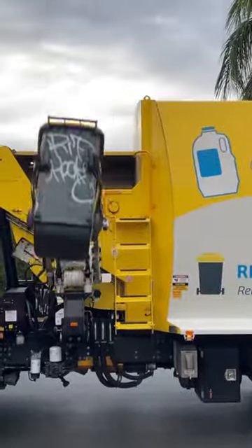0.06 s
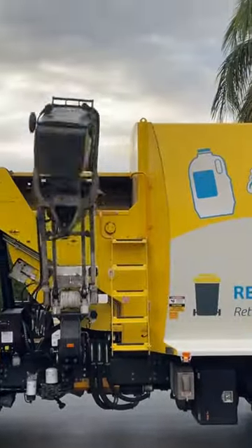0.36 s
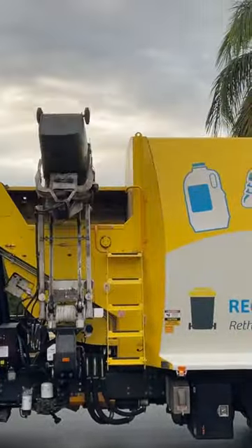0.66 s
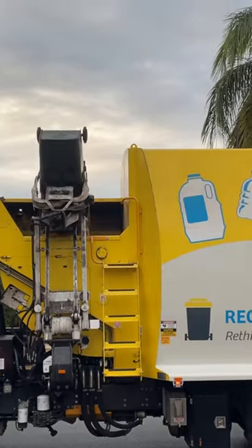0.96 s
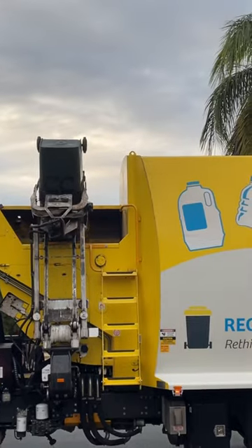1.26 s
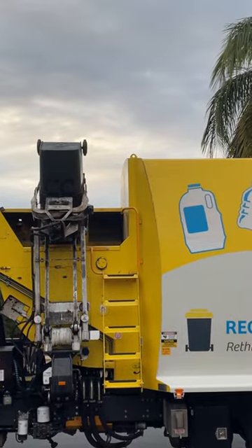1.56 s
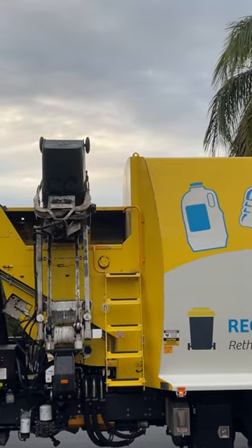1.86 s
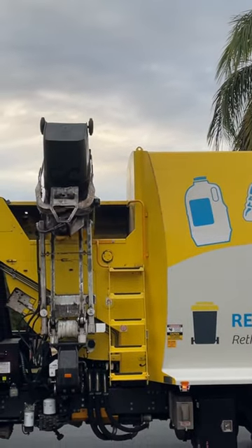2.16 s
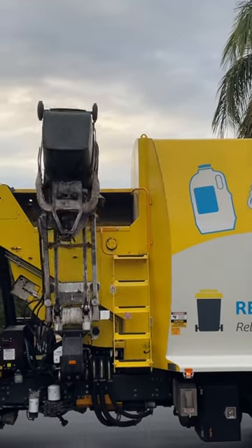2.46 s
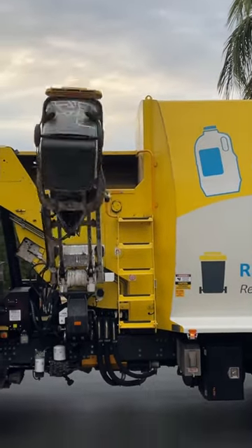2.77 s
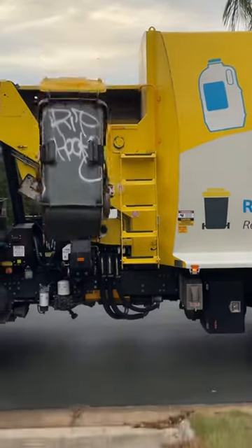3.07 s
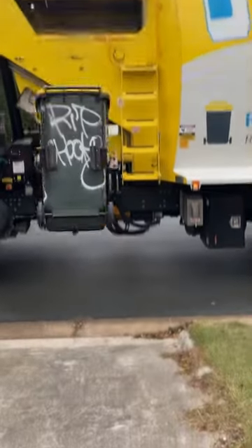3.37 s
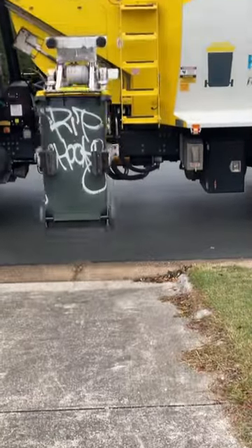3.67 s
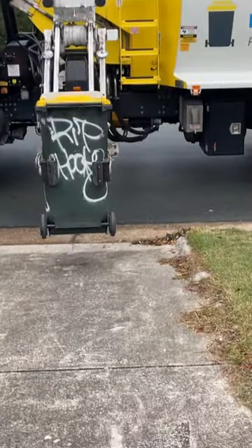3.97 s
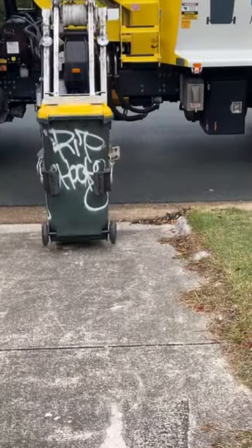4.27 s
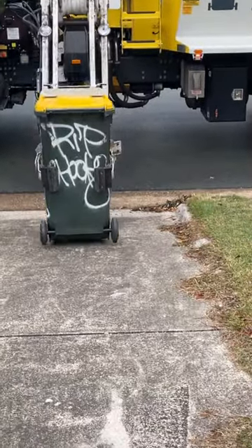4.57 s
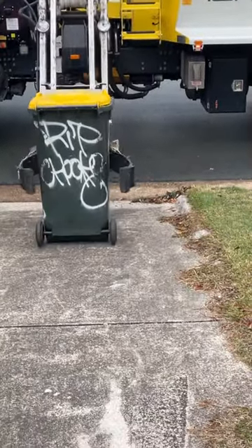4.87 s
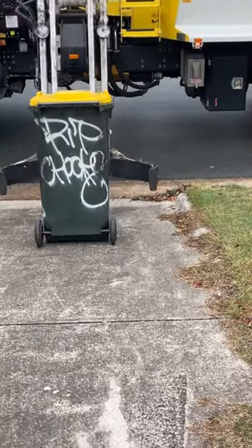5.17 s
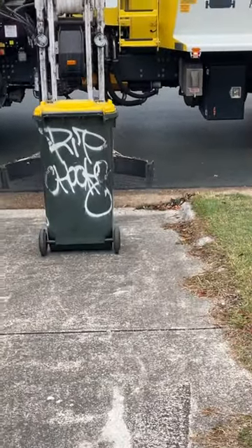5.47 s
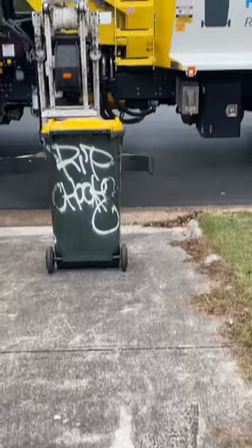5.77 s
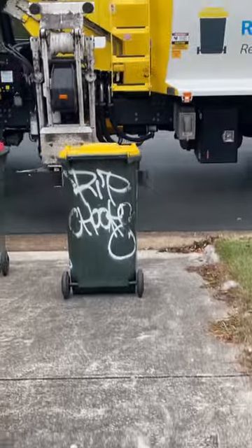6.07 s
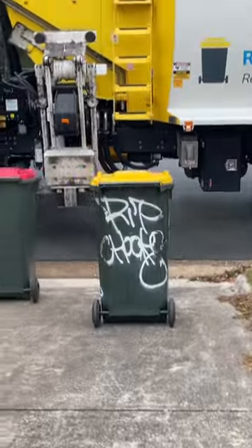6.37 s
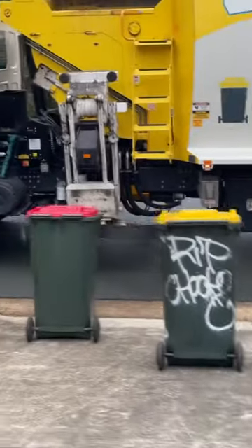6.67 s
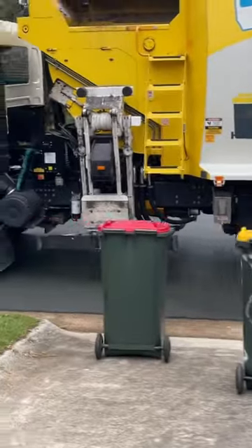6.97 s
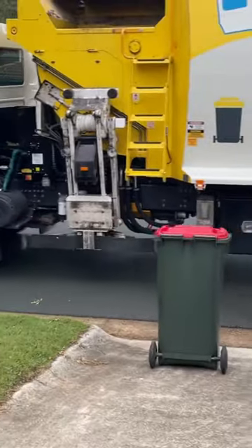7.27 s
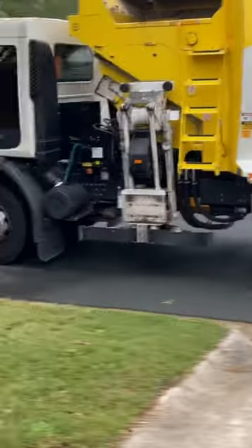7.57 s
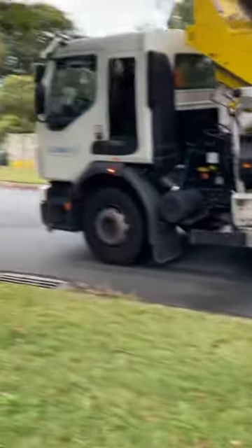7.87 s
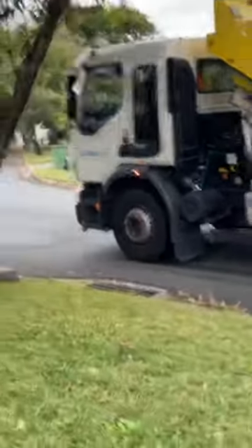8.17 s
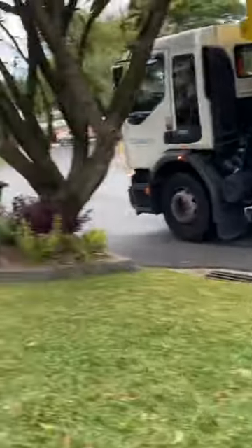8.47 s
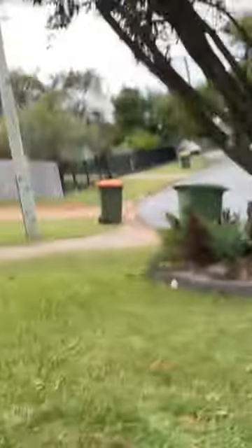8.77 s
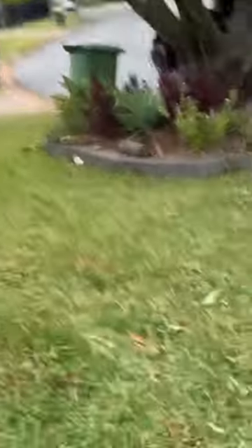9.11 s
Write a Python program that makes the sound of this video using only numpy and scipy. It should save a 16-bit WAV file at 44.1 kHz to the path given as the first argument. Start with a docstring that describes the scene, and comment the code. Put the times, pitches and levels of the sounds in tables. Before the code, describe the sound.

A recycling truck's diesel engine labours at the kerb, heard from the footpath, while hydraulic valves whistle and a steel arm clanks. From about 0.8 to 1.4 seconds bottles and cans crash into the hopper in two loud surges, with heavy thuds, metal bangs and short squeals; the last pieces trickle out until about 2 seconds. The engine dips briefly, then idles as the arm lowers with a hum, a faint whistle and clanks near 2.8 and 3.3 seconds. At about 4.8 seconds the empty plastic bin scuffs and lands on concrete with a hollow boom. Lighter knocks follow, and the gripper creaks briefly near 5.8 seconds. The engine then revs steadily higher, with a sharp clank at 7.2 seconds, thin whines and ringing body panels as the truck pulls away. The revs peak around 8.5 seconds and ease off by 9.3.

```python
"""A side-loading recycling truck stands at the kerb, its diesel and hydraulic pump labouring to lift a bin.
Valves whistle, the steel arm clanks and squeals by stick-slip friction, and after about a second
bottles and cans crash into the resonant hopper. The engine idles as the arm lowers, and near five
seconds the hollow bin booms down on concrete. The gripper creaks open; last, the engine revs,
driving the body panels into resonance, and the truck pulls away."""
import sys
import numpy as np
from scipy import signal
from scipy.fft import rfft, irfft, next_fast_len
from scipy.io import wavfile
from scipy.ndimage import uniform_filter1d, map_coordinates

SR = 44100
rng = np.random.default_rng(int(sys.argv[2]) if len(sys.argv) > 2 else 0)


def wav_record(signal):
    """Record a signal, one row per channel, as 16-bit PCM in the file named by sys.argv[1]."""
    frames = np.transpose(np.atleast_2d(signal))
    bounded = np.clip(frames, -1, 1)
    # unit amplitude maps onto the largest positive 16-bit level
    quanta = np.round(bounded * 32767).astype(np.int16)
    wavfile.write(sys.argv[1], SR, quanta)


N = 411894
TIME = np.arange(N) / SR

# engine speed (time [s], firing rate [Hz])
FIRING_RATE = [(0, 41.6), (2.5, 43), (4, 41.7), (5.45, 43), (5.75, 49), (6.55, 61), (6.9, 70), (7.3, 82.5),
               (7.7, 90.7), (8.05, 98), (8.52, 103.2), (8.8, 89), (9.12, 82), (9.34, 70)]
# the engine labours, coasts as the load drops out, then pulls away (time [s], effort re idle [dB])
ENGINE_EFFORT = [(0, 9.5), (1.08, 10), (1.22, -6), (1.45, -22), (1.65, -1), (3.4, 0), (4.2, 0), (5.85, 1.5),
                 (6.35, -0.5), (6.65, 2), (7.05, 2), (7.33, 3.5), (7.57, 8), (7.8, 5.5), (7.92, 2.5),
                 (8.56, 6.5), (8.92, 0.5)]
# range of the engine (time [s], distance [m])
ENGINE_DISTANCE = [(7.6, 6.33), (8.5, 8.2), (8.92, 9.1), (9.34, 9.5)]
# level laws (idle level [dB], speed slope [dB/octave], share of effort [ratio],
# gain with the bin aloft [dB], distance slope [dB/doubling])
EXHAUST_LAW = (-35, 6, 1, -0.5, -5.5)
RUMBLE_LAW = (-38.5, 7, 0.35, 1, -1)
CLATTER_LAW = (-36.5, 8.5, 0.5555, 2.5, -16.5)
HISS_LAW = (-45, 11.5, 0.26, 5, -9)
SINGING_LAW = (-43, 8.5, 0.7, 5, -13.5)
BOOM_LAW = (-46.5, 4, 0.92, 0.5, -18)
# harmonics of the four-stroke cycle of six unequal cylinders
# (order [ratio], weight at idle [dB], weight at full revs [dB])
EXHAUST_ORDERS = [(4, .5, 3.5), (6, 3, 6.5), (7, -23, -7), (8, -21, -4), (9, -8.5, -2), (10, -12, -0.5),
                  (11, -19, -8), (12, .5, .5), (13, -25, -8), (14, -26, -4.5), (16, -27, -5.5),
                  (18, -11.5, -9), (20, -11, -10), (24, -23, -9)]
# spectra of the exhaust pipe and the engine's noises (frequency [Hz], relative level [dB])
PIPE_RESPONSE = [(25, -38), (43, -12.5), (60, -6.5), (86, 1.5), (105, -13), (135, 4), (200, 1.5),
                 (300, -2.5), (450, -12)]
RUMBLE_SPECTRUM = [(20, -40), (45, -4), (70, 2.5), (110, 6.5), (190, 5.5), (260, 6), (340, -3), (600, -78),
                   (1500, -67)]
CLATTER_SPECTRUM = [(150, -12), (330, 0), (470, 5), (750, 3.5), (1000, 3), (1350, 1), (1800, -3.5),
                    (2600, -5.5), (3200, -12), (5000, -31), (10000, -33)]
HISS_SPECTRUM = [(1200, -6.5), (2500, 5.5), (3500, 2.5), (5000, 1), (7500, -2), (9000, -6.5), (11500, -9),
                 (13500, -19), (15500, -13.5)]
# panels that sing at high revs
# (frequency [Hz], bandwidth [Hz], relative level [dB], most exciting firing rate [Hz], its spread [Hz])
SINGING_MODES = [(850, 53, -3, 88, 5.2), (1410, 110, -1.5, 107.5, 6.9), (1750, 51, -3, 95, 16),
                 (2130, 75, -2.5, 72.5, 7.9), (2635, 94, -2.5, 99, 5), (2820, 180, -5, 110, 7.2)]
# drivetrain whines (start [s], end [s], first pitch [Hz], last pitch [Hz], level [dB])
DRIVETRAIN_WHINES = [(6.7, 7.15, 2095, 2185, -39), (7.68, 8.12, 2690, 2600, -35),
                     (8.02, 8.36, 2600, 2690, -36.5), (8.85, 9.4, 900, 780, -45)]
# pump harmonics (multiple of the piston rate [ratio], level [dB])
PUMP_HARMONICS = [(1, -46), (2, -48.5), (3, -52.5), (4, -49), (5, -46.5), (8, -58), (10, -51.5), (16, -75)]
# hum of the oil line during arm strokes (start [s], end [s], level [dB])
ARM_STROKES = [(1.05, 2.664, -40), (5.05, 5.483, -42)]
# valve tones while lifting and lowering (start [s], end [s], pitch [Hz], initial level [dB])
VALVE_WHISTLES = [(0.052, 0.77, 1880, -30.5), (0, 0.65, 1090, -35.5), (0.28, 0.58, 1285, -34),
                  (.05, 0.83, 2680, -42), (1.85, 3.2, 2000, -46.5)]
# resonances of each part (frequency [Hz], bandwidth [Hz], relative level [dB])
PANEL_MODES = [(660, 40, 10), (850, 17, -24), (1262, 35, 9.5), (1720, 13, -4), (2060, 20, -11),
               (2500, 24, 3), (3394, 103, 0)]
BODY_MODES = [(230.6, 21, 1.5), (285.8, 11.5, 1.5)]
GRIPPER_MODES = [(2840, 65, 1.5), (3510, 75, -3)]
JOINT_MODES = [(2190, 76, 6), (2300, 110, -13), (3800, 170, -3.5), (5300, 210, -11)]
BIN_CAVITY_MODES = [(187, 12, 3), (468, 42, 9), (540, 65, 9), (640, 23, -18), (897.5, 44, -24)]
SHARD_MODES = [(4400, 900, -6), (5440, 900, 2)]
HOPPER_MODES = [(670, 58, -14), (1345, 23, 5.5), (1574, 25, 5.5), (1860, 47, -19), (2215, 18, 10),
                (3240, 63, -27), (2350, 63, 1), (2740, 75, -7), (3700, 72, -5)]
# squeaks of the shaking arm (time [s], duration [s], level [dB], pitch [Hz])
ARM_SQUEALS = [(.722, .04, -32, 2150), (.876, .028, -20, 2155), (.988, .034, -20, 2160),
               (1.016, .022, -20, 2330), (1.192, .045, -17, 2195), (1.245, .055, -25, 2210),
               (1.315, .085, -26, 2180), (1.396, .03, -30, 2320), (1.62, .12, -38, 2210),
               (1.832, .035, -32, 2160)]
# blows on arm and body
# (time [s], level [dB], ring frequency [Hz], ring weight [dB], crack weight [dB], body T60 [s])
STEEL_BLOWS = [(.004, -13.5, 449, 1, -34, 0.31), (.585, -22, 2220, -3, -20, 0.34),
               (.602, -23, 1096, -7, -24, 0.19), (.749, -15.5, 635, -2, -37, .25),
               (.77, -10, 450, -3.5, -38, 0.18), (.801, -9, 660, -14, -23, .29),
               (.83, -14, 487, 6.5, -18, 0.36), (.904, -6, 850, -1.5, -28, 0.14),
               (.909, -7, 441, -2, -24, .1), (1.018, -15, 850, -4, -30, 0.13),
               (1.075, -0.5, 1900, -13, -26, 0.088), (1.098, -18, 952, 1, -29, 0.18),
               (1.123, -16, 1550, -3, -24, 0.12), (1.142, -12.5, 2420, -3.5, -21, 0.14),
               (1.198, -7, 752, -3, -30, 0.13), (1.256, -14.5, 690, 0, -28, 0.17),
               (1.388, -16, 1198, -0.5, -22, 0.18), (2.059, -20.5, 652, -7, -26.5, 0.14),
               (2.836, -18, 441, 0, -34, 0.23), (2.843, -15.5, 1164, -5.5, -27.5, 0.16),
               (3.309, -19.5, 1287, -3.5, -25, 0.18), (3.365, -27.5, 422, -1, -38, .15),
               (4.781, -8.5, 511, 1, -32, 0.19), (4.827, -15.5, 1466, -10, -40, 0.22),
               (5.12, -17, 1096, -7, -27, 0.3), (5.255, -20, 1600, -6.5, -39, .29),
               (5.565, -23, 1090, -0.5, -34, 0.27), (6.073, -20.5, 495, 2.5, -40, 0.36),
               (6.151, -16.5, 1070, -8, -36, 0.16), (6.239, -21, 850, -3, -22, 0.17),
               (7.165, -12.5, 2280, -9, -18, 0.15), (7.175, -7, 1057, -6.5, -19, 0.12),
               (7.191, -13, 935, 2, -35, 0.38)]
# modes of a struck steel part (multiple of the ring frequency [ratio], relative level [dB], T60 [s])
STEEL_MODES = [(1, 6.5, 0.13), (.55, -10, 0.28), (1.38, -7, 0.11), (1.9, -6.5, 0.24)]
# spectra of impacts (frequency [Hz], relative level [dB])
STEEL_SPECTRUM = [(120, -23), (300, 0), (480, 3), (900, 0.5), (1500, -2.5), (2500, -18), (4000, -21),
                  (9000, -67)]
THUD_SPECTRUM = [(40, -33), (100, 20), (250, 27), (600, -32)]
TUMBLE_SPECTRUM = [(30, -32), (70, -9), (110, -31), (200, -13), (350, -5), (700, 7), (1300, -1.5),
                   (2200, -2), (3200, -8.5), (5000, -32), (8000, -44), (15500, -49)]
GLASS_SPECTRUM = [(2000, -20), (4000, 1), (6000, -1), (9000, 0.5), (12000, -12), (15500, -20)]
CRACK_SPECTRUM = [(1200, -7), (2600, 10), (3600, 2.5), (5000, 0.5), (8000, -7.5), (15000, -24)]
THUMP_SPECTRUM = [(25, -20), (50, 14), (100, -10), (220, 9), (400, -26)]
# the empty bin meets the ground (time [s], drum level [dB], knock level [dB])
BIN_CONTACTS = [(4.786, -15, -16.5), (4.829, -14, -29), (4.94, -14, -28)]
# modes of the plastic bin (frequency [Hz], relative level [dB], T60 [s])
BIN_MODES = [(68, 2, 0.68), (118, -7.5, 0.6), (161, -8, 0.25), (242, -15, 0.17)]
# the load hits the hopper floor, later the bin the ground
# (time [s], thud level [dB], drum frequency [Hz], drum level [dB])
HEAVY_IMPACTS = [(.772, -30, 308, -20), (.801, -18, 230, -22), (.83, -16, 259, -17), (.889, -23, 72.6, -7),
                 (.91, -25.5, 327, -16), (.974, -27, 80, -14), (1.015, -25.5, 290, -20),
                 (1.056, -18, 253, -12), (1.07, -21, 95, -15), (4.782, -18, 237, -34)]
# the load slides out in two surges (time [s], glass level [dB], tumble level [dB], tumble decay [dB/s])
LOAD_SURGES = [(.81, -25.5, -18, 113), (1.051, -25.5, -13.5, 60.5)]
# likeness of the two microphone ports (frequency [Hz], correlation [ratio, clipped to +-1 in use])
PORT_CORRELATION = [(200, 1), (600, 0.71), (2200, 0.86), (3200, 0.26), (4600, 0.62), (5900, 0.05),
                    (7400, -1.29), (8100, -0.9), (10400, 1), (11700, 1.5), (12800, -0.2), (13600, -1.2)]
# their balance (frequency [Hz], left minus right [dB])
PORT_BALANCE = [(100, -3), (600, -3), (1200, -2.5), (2300, 0), (10000, 0.9)]

CYLINDERS, FULL_REVS_HZ = 6, 87.6
ALOFT_END_S, ARM_PARKED_S, RAMP_S = 1.97, 6.2, 0.092  # the bin starts down; the arm rests; fade time


def amp(db):
    """Decibels to amplitude ratio."""
    return 10 ** (np.asarray(db) / 20)


def unit(x):
    """Normalise to rms 1."""
    return x / np.sqrt(np.mean(x ** 2) + 1e-20)


def along(points, hz):
    """Interpolate (frequency, value) points on a logarithmic axis."""
    f, v = np.transpose(points)
    return np.interp(np.log(hz + 1), np.log(f + 1), v)


def curve(points):
    """Interpolate (time, value) points at every sample."""
    return np.interp(TIME, *np.transpose(points))


def wobble(rate):
    """Smooth random modulation with `rate` knots a second."""
    knots = rng.standard_normal(int(N * rate / SR) + 4)
    return np.interp(TIME, TIME[::32], map_coordinates(knots, [TIME[::32] * rate]))


def filtered(x, response):
    """Linear filtering: multiply the spectrum by a frequency response."""
    n = x.shape[-1]
    padded = next_fast_len(n + 8192, True)
    return irfft(rfft(x, padded) * response(np.fft.rfftfreq(padded, 1 / SR)), padded)[..., :n]


def coloured(x, spectrum):
    """Shape x with a spectral envelope; rms 1."""
    return unit(filtered(x, lambda hz: amp(along(spectrum, hz))))


def resonate(x, modes):
    """Forced response of damped resonators in parallel; rms 1."""
    def response(f):
        return sum(amp(db) * 1j * f * width / (hz * hz - f * f + 1j * f * width)
                   for hz, width, db in modes)
    return unit(filtered(x, response))


def noise(size=N):
    """Gaussian white noise."""
    return rng.standard_normal(size)


def phase_of(hz):
    """Phase in radians, the integral of frequency."""
    return 2 * np.pi * np.cumsum(hz) / SR


def grains(per_s, spread_db):
    """A Poisson train of tiny impacts of unequal strength."""
    return (rng.random(N) < per_s / SR) * noise() * amp(spread_db * np.clip(noise(), -2, 2))


def add(track, s, sound):
    """Superpose a sound on the track at s seconds."""
    part = track[max(round(s * SR), 0):][:len(sound)]
    part += sound[:len(part)]


def gate(start, end, ramp_s):
    """Trapezoidal envelope between two times."""
    return np.clip(np.minimum(TIME - start, end - TIME) / ramp_s, 0, 1)


def swell(s, db, rise, fall):
    """Exponential growth to a peak at s seconds, then decay; slopes in dB/s."""
    return amp(db - np.maximum((s - TIME) * rise, (TIME - s) * fall).clip(0, 200))


def level_db(law, firing_hz, coasts=False):
    """Speed, effort, raised bin and distance add in decibels; effort falls below idle only if `coasts`."""
    idle_db, octave_db, share, aloft_db, far_db = law
    effort_db, metres = curve(ENGINE_EFFORT), curve(ENGINE_DISTANCE)
    effort_db = effort_db if coasts else np.maximum(effort_db, 0)
    aloft = np.clip((ALOFT_END_S - TIME) / RAMP_S + .5, 0, 1)
    speed_db = octave_db * np.log2(firing_hz / firing_hz[0])
    distance_db = far_db * np.log2(metres / metres[0])
    return idle_db + speed_db + share * effort_db + aloft_db * aloft + distance_db


def street(dry):
    """Scattering from road and truck side decorrelates the sound at the two microphone ports."""
    t = np.arange(SR // 4) / SR
    tail = noise(len(t)) * amp(-60 * t / 0.074)
    scattered = signal.fftconvolve(dry, tail / np.linalg.norm(tail))[:N]
    angle = lambda hz: np.arccos(np.clip(along(PORT_CORRELATION, hz), -1, 1)) / 2
    mid = filtered(dry, lambda hz: np.cos(angle(hz)))
    side = filtered(scattered, lambda hz: np.sin(angle(hz)))
    balance = lambda hz: amp(np.outer([.5, -.5], along(PORT_BALANCE, hz)))
    return filtered(np.array([mid + side, mid - side]), balance)


def exhaust(firing_hz):
    """Source and filter: harmonics of the engine cycle sweep through the pipe's resonances."""
    phase = phase_of(firing_hz)
    # accelerating takes fuel, which strengthens the firing pulse itself
    fuel = uniform_filter1d(np.clip(np.gradient(firing_hz) * SR / 15, 0, 1), size=SR // 5)
    revs = np.interp(firing_hz, [firing_hz[0], FULL_REVS_HZ], [0, 1])
    harmonics, power = 0, 0
    for order, idle_db, full_db in EXHAUST_ORDERS:
        pipe_db = along(PIPE_RESPONSE, firing_hz * order / CYLINDERS)
        fuel_db = 2.9 * fuel * (order == CYLINDERS)
        gain = amp(idle_db + revs * (full_db - idle_db) + pipe_db + fuel_db)
        angle = phase * order / CYLINDERS + rng.uniform(0, 2 * np.pi)
        harmonics += gain * amp(1.34 * wobble(9)) * np.sin(angle + 0.2 * wobble(10))
        power += gain ** 2 / 2
    return amp(level_db(EXHAUST_LAW, firing_hz, coasts=True)) * harmonics / np.sqrt(power)


def engine_block(firing_hz):
    """Amplitude-modulated noise: each firing rattles block and panels into rumble, clatter and hiss."""
    pulse = np.cos(phase_of(firing_hz))
    knock = unit(amp(1.1 * pulse + 1.1 * wobble(70)))
    rumble = coloured(knock * noise(), RUMBLE_SPECTRUM)
    clatter = coloured(knock * noise(), CLATTER_SPECTRUM)
    clatter += amp(-10) * resonate(knock * noise(), PANEL_MODES)
    rumble_db = level_db(RUMBLE_LAW, firing_hz, coasts=True)
    clatter_db = level_db(CLATTER_LAW, firing_hz) + 0.29 * wobble(10)
    hiss_db = level_db(HISS_LAW, firing_hz) + 1.2 * wobble(12)
    hiss = coloured(amp(.5 * pulse) * noise(), HISS_SPECTRUM)
    return amp(rumble_db) * rumble + amp(clatter_db) * clatter + amp(hiss_db) * hiss


def panels(firing_hz):
    """Forced vibration: each panel sings out as the firing rate nears the one that excites it most."""
    pulsing = amp(1.1 * np.cos(phase_of(firing_hz)))
    out = 0
    for hz, width, db, best_rate, spread in SINGING_MODES:
        response = 1 / np.hypot(1, (firing_hz - best_rate) / spread)
        out += amp(db) * response * resonate(pulsing * noise(), [(hz, width, 0)])
    return amp(level_db(SINGING_LAW, firing_hz)) * out


def drivetrain(firing_hz, flutter_hz=30):
    """Modulated tones: brief whines glide and flutter in pitch, and pulse at the firing rate."""
    out = 0
    for start, end, first_hz, last_hz, db in DRIVETRAIN_WHINES:
        hz = np.interp(TIME, [start, end], [first_hz, last_hz]) + flutter_hz * wobble(120)
        out += amp(db) * gate(start, end, RAMP_S) * np.sin(phase_of(hz))
    return out * amp(2 * np.cos(phase_of(firing_hz)) + 1.8 * wobble(40))


def hydraulics(firing_hz, unloaded_db=-2):
    """Pressure ripple: the pump hums in the oil line and, once the arm rests, booms in the body."""
    phase = phase_of(firing_hz * 19 / 6)  # the pistons are geared to the crank
    speed = firing_hz / firing_hz[0]
    parked = np.clip((TIME - ARM_PARKED_S) / RAMP_S, 0, 1)
    over_idle_db = level_db(CLATTER_LAW, firing_hz) - CLATTER_LAW[0]
    effort = amp(.5 * over_idle_db + unloaded_db * parked) / np.sqrt(speed)
    roughness = .3 * speed ** 2.4
    pump = sum(amp(db + 4.8 * wobble(9)) * np.sin(k * phase + roughness * wobble(45))
               for k, db in PUMP_HARMONICS)
    pump = filtered(pump, lambda hz: 1 / (1 + (hz / 2700) ** 8))
    pressure = sum(amp(db) * gate(start, end, RAMP_S) for start, end, db in ARM_STROKES)
    pressure += swell(1.27, db=-27, rise=150, fall=105)  # the arm meets its end stop
    hum = pressure * amp(3.3 * wobble(16)) * np.sin(2 * phase + 0.39 * wobble(35))
    boom = resonate(parked * np.sin(phase + 0.31 * wobble(45)), BODY_MODES)
    return np.sqrt(2) * (effort * pump + hum) + amp(level_db(BOOM_LAW, firing_hz)) * boom


def valves(flutter_hz=17, sag_db_per_s=5):
    """Flow-excited tones: oil forced through a valve whistles, wavering and fading along the stroke."""
    out = 0
    for start, end, hz, db in VALVE_WHISTLES:
        envelope = amp(db - sag_db_per_s * (TIME - start)) * gate(start, end, ramp_s=0.16)
        flicker = amp(2.9 * wobble(130) + 1.4 * wobble(11))
        pitch = hz + 8 * wobble(7.4) + flutter_hz * wobble(160)
        out += envelope * flicker * np.sin(phase_of(pitch))
    return np.sqrt(2) * out


def gripper_creak():
    """Stick-slip friction: the opening gripper's joint rings under a short burst of tiny jerks."""
    jerks = grains(per_s=810, spread_db=2)
    return amp(-36) * gate(5.82, 5.883, ramp_s=0.01) * resonate(jerks, GRIPPER_MODES)


def arm_squeals(flutter_hz=44.6, chatter_db=2.5):
    """Stick-slip oscillation of steel on steel: a chattering tone, and a rasp that rings the joint."""
    rub, pitch = np.zeros((2, N))
    for s, length, db, hz in ARM_SQUEALS:
        pitch[int(s * SR):] = hz
        add(rub, s, amp(db) * signal.windows.tukey(int(length * SR), .6))
    chatter = amp(chatter_db * np.minimum(wobble(260), 1.2))
    tone = unit(chatter * np.sin(phase_of(pitch + flutter_hz * wobble(450))))
    rasp = resonate(grains(per_s=2500, spread_db=2), JOINT_MODES)
    return rub * (amp(-1) * tone + amp(-6.5) * rasp)


def arm_clanks():
    """Impact excitation: a blow rings the part's modes and shakes the body, with a thud and a crack."""
    out, t = np.zeros(N), np.arange(SR // 2) / SR
    for s, db, hz, ring_db, crack_db, t60 in STEEL_BLOWS:
        fade_db = -60 * t / t60
        ring = 0
        for ratio, mode_db, mode_t60 in STEEL_MODES:
            phase = 2 * np.pi * hz * ratio * t + rng.uniform(0, 2 * np.pi)
            ring += amp(mode_db - 60 * t / mode_t60) * np.sin(phase)
        afterring = amp(-17.5 - 60 * t / 0.63)
        body = coloured(noise(len(t)), STEEL_SPECTRUM) * (amp(fade_db) + afterring)
        thud = coloured(noise(len(t)), THUD_SPECTRUM) * amp(-27 + 0.46 * fade_db)
        crack = coloured(noise(len(t)), CRACK_SPECTRUM) * amp(crack_db + 16.5 + 1.15 * fade_db)
        attack = 1 - np.exp(-t / (0.0033 * t60))  # loose parts build up gradually
        add(out, s, amp(db - 8) * (amp(ring_db) * ring + body + thud + crack) * attack)
    return out


def wheel_scuff():
    """Sliding friction: the bin's wheels scrape the concrete, shaking the steel arm."""
    scrape = coloured(grains(per_s=4000, spread_db=1.6), STEEL_SPECTRUM)
    return swell(4.692, db=-25, rise=2950, fall=60) * scrape


def bin_landing():
    """Wall and cavity resonance: the empty bin drums and knocks as it drops and rocks on its wheels."""
    out, t = np.zeros(N), np.arange(SR) / SR
    for s, drum_db, knock_db in BIN_CONTACTS:
        drum = sum(amp(db + rng.normal(0, 1) - 60 * t / t60) * np.sin(2 * np.pi * hz * t)
                   for hz, db, t60 in BIN_MODES)
        knock = resonate(noise(len(t)), BIN_CAVITY_MODES) * amp(-60 * t / 0.28)
        attack = 1 - np.exp(-t / 0.0014)
        add(out, s, (amp(drum_db) * drum + amp(knock_db) * knock) * attack)
    return out


def thuds(thud_t60_s=0.34, drum_t60_s=0.12):
    """Damped free vibration: a heavy mass lands with a dull thud and the struck wall drums briefly."""
    out, t = np.zeros(N), np.arange(SR // 2) / SR
    for s, db, hz, drum_db in HEAVY_IMPACTS:
        thud = coloured(noise(len(t)), THUD_SPECTRUM) * amp(db - 60 * t / thud_t60_s)
        drum = np.sin(2 * np.pi * hz * t) * amp(drum_db - 60 * t / drum_t60_s)
        attack = 1 - np.exp(-t / 0.0012)
        add(out, s, (thud + drum) * attack)
    return out


def last_shard(t60_s=0.35):
    """Friction-excited resonance: one late piece of glass skids brightly down the hopper wall."""
    scrape = resonate(grains(per_s=3000, spread_db=2), SHARD_MODES)
    return swell(2.335, db=-43.5, rise=2003, fall=60 / t60_s) * scrape


def bottles(per_s=110, centre_hz=1000, span_octaves=3, t60_s=0.07):
    """Each bottle or can, struck at a random time, rings at its own natural frequency; rms 1."""
    out, t = np.zeros(N), np.arange(SR // 10) / SR
    for when, pitch, strength in rng.random((int(per_s * N / SR), 3)):
        hz = centre_hz * 2 ** (span_octaves * (pitch - .5))
        add(out, when * N / SR, amp(6 * strength - 60 * t / t60_s) * np.sin(2 * np.pi * hz * t))
    return unit(out)


def pour(tumble_lag_s=0.042):
    """Superposed random impacts: glass ticks and thumps, then bottles and cans tumble in the hopper."""
    trickle = gate(1.08, 1.92, ramp_s=0.11)  # the last bottles are shaken out
    spray_gain, tumble_gain = amp(-43) * trickle, amp(-34.5) * trickle
    for s, glass_db, tumble_db, fall in LOAD_SURGES:
        spray_gain += swell(s, glass_db, rise=200, fall=178)
        surge = swell(s + tumble_lag_s, tumble_db, rise=104, fall=fall)
        tumble_gain = np.hypot(tumble_gain, surge)  # incoherent sounds add in power
    pelting = coloured(grains(per_s=3000, spread_db=2.5), TUMBLE_SPECTRUM)
    hopper = resonate(grains(per_s=1500, spread_db=2.5), HOPPER_MODES)
    glass = coloured(grains(per_s=7000, spread_db=2.2), GLASS_SPECTRUM)
    tumble = amp(-1) * pelting + amp(-5) * bottles() + amp(-6.5) * hopper
    thump = coloured(grains(per_s=140, spread_db=1.5), THUMP_SPECTRUM)
    return tumble_gain * tumble + spray_gain * (glass + amp(-1.5) * thump)


def scene():
    """Superposition of the truck, its arm and its load, heard from the footpath."""
    firing_hz = curve(FIRING_RATE)
    truck = exhaust(firing_hz) + engine_block(firing_hz) + panels(firing_hz) + drivetrain(firing_hz)
    arm = hydraulics(firing_hz) + valves() + arm_squeals() + gripper_creak() + arm_clanks()
    load = pour() + last_shard() + thuds() + wheel_scuff() + bin_landing()
    return street(truck + arm + load)


def record(dry):
    """Soft saturation rounds the highest peaks; a band limit removes the extreme treble."""
    rounded = dry / (1 + np.abs(dry) ** 6) ** (1 / 6)
    return filtered(rounded, lambda hz: hz < 15800)


dry = scene()
out = record(dry)
wav_record(out)
```